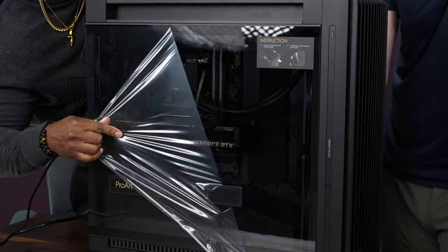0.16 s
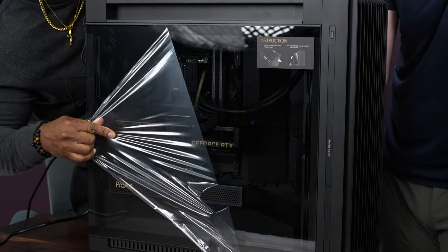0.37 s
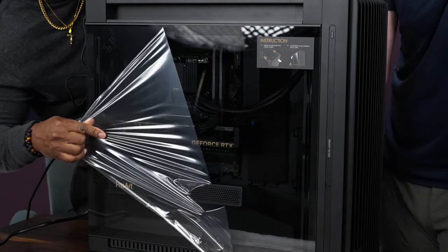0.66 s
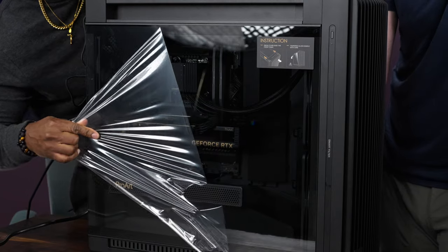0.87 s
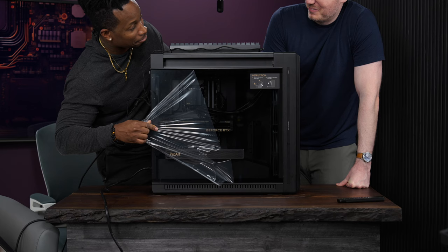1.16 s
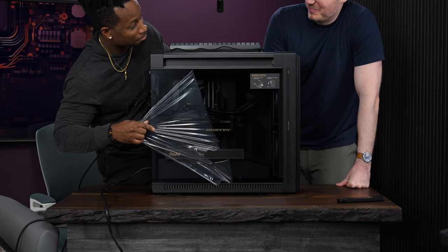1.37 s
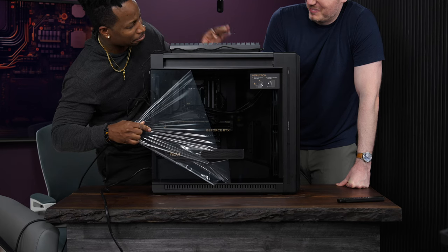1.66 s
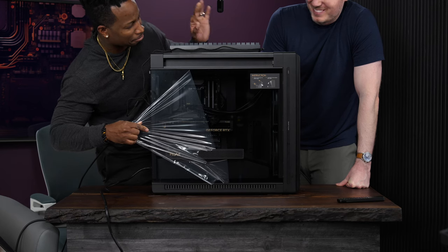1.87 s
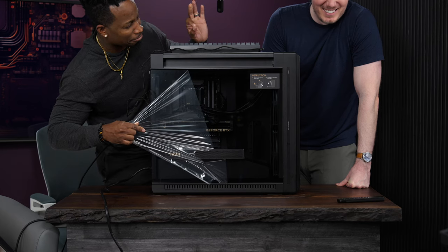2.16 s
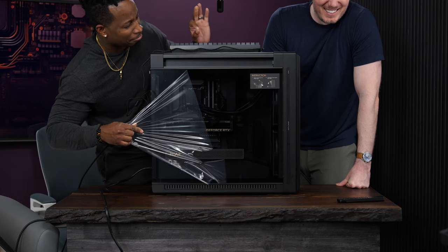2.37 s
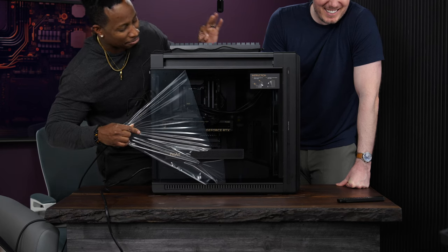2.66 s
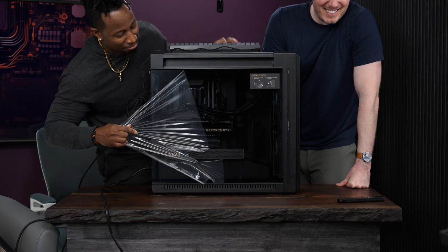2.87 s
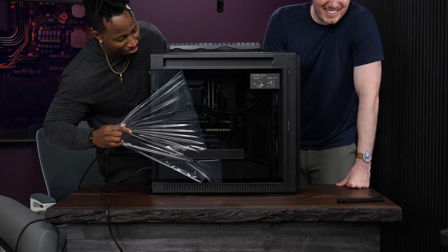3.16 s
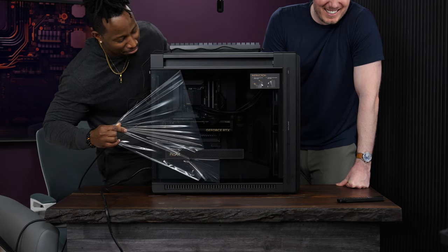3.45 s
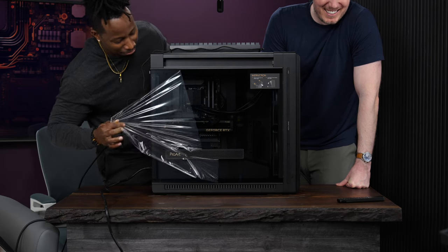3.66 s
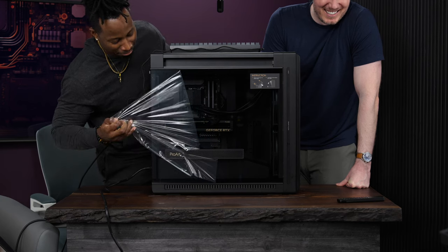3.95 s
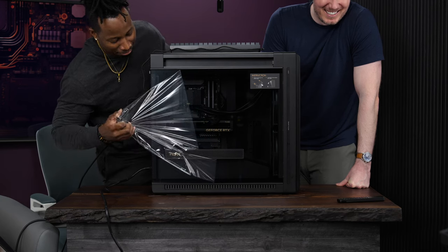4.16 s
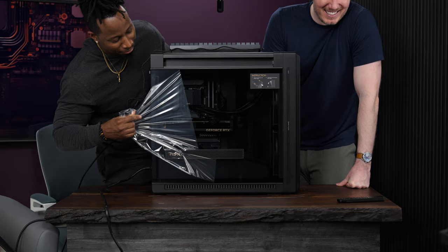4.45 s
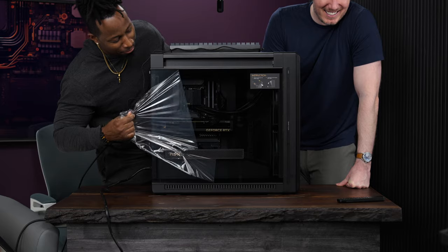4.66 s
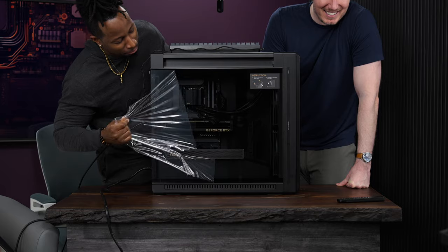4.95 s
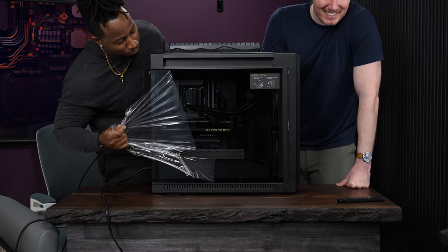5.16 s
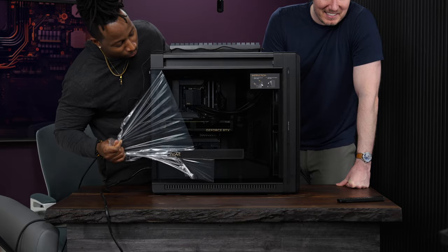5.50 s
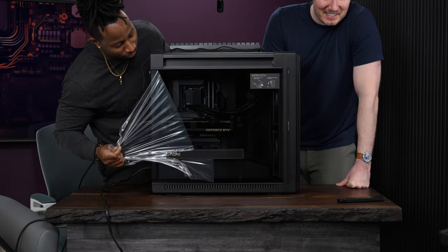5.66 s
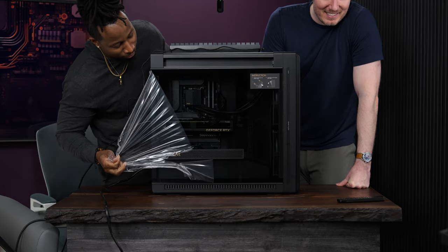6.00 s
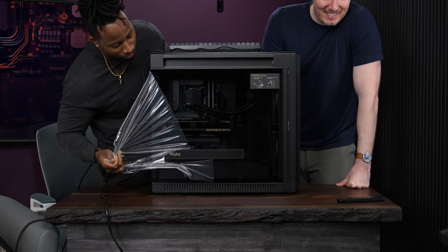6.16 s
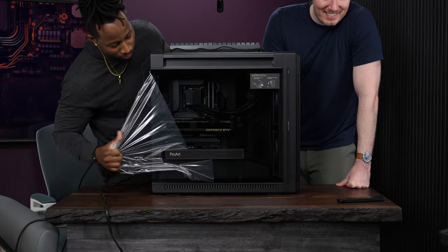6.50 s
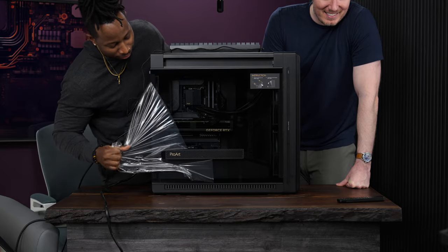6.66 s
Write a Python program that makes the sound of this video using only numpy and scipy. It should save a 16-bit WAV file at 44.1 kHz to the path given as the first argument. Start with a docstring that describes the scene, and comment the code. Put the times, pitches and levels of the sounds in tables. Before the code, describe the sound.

In a small, dry room, a close microphone catches film being peeled from a computer case's glass panel. Fast buzzing tick trains and tiny high squeaks fade to near quiet, then irregular tearing snaps thump the panel. The slack sheet flaps with sharp cracks, is regripped in a crackling burst, rustles faintly and is finally squeezed.

```python
"""Ticking trains of a film letting go are heard first, over a faint rustle, in a small, dry room.
Protective film is peeled off the glass side panel of a computer case: stick-slip clicks make the ticks,
gliding harmonics two squeals, bursts of tiny snaps the tears, and panel modes the thumps.
Then the slack sheet flaps, crackles and rustles in the hand, made of ringing clicks and random grains.
Near echoes take paths about 1.7 to 3.7 m longer than the direct one; the microphone sheds rumble."""
import sys
import numpy as np
from scipy import signal
from scipy.fft import rfft, irfft
from scipy.io import wavfile
from scipy.ndimage import uniform_filter1d

SR = 44100
rng = np.random.default_rng(int(sys.argv[2]) if len(sys.argv) > 2 else 0)


def transcribe(u):
    """Save the signal u as a 16-bit wav file named by the first command-line argument.

    u: samples, shape (n,) or (channels, n), limited to [-1, 1]; the rate is SR.
    q: integer samples, one column per channel.
    """
    v = np.clip(np.atleast_2d(u).T, -1, 1)
    q = np.round(v * 32767).astype(np.int16)
    wavfile.write(sys.argv[1], SR, q)


N = 301203
TIME = np.arange(N) / SR  # s

# Room tone. Each row: frequency in Hz, relative level in dB.
AIR_COLOUR = [(24, -61), (40, 5), (189, -39), (422, -41), (585, -26), (680, 16), (1150, -38), (2210, 10),
              (2700, 1), (4460, 10.5), (16000, -2)]
# Stir of the loose sheet in the hand. Each row: time in seconds, crackle level in dB.
HANDLING = [(0, -46), (.16, -58), (.26, -68), (.46, -60.5), (.6, -78), (1.4, -65), (1.8, -68.5),
            (2.23, -77), (2.9, -68.5), (3.56, -61), (3.8, -63), (4.4, -62.5), (5.2, -64.5), (5.55, -68),
            (5.9, -65), (6.26, -57), (6.38, -58.5), (6.68, -58)]
# The hand takes a new grip. Each row: time in seconds, crackle in dB, shake in dB, before the grip gain.
REGRIP = [(4.42, -55, -62), (4.54, -56.5, -59.5), (4.61, -44.5, -42.5), (4.72, -45, -48.5),
          (4.87, -46, -48.5), (4.93, -50, -49.5), (4.97, -61.5, -67)]
# The hand squeezes the sheet. Each row: time in seconds, crackle in dB, shake in dB, before the grip gain.
SQUEEZE = [(6.68, -72, -84), (6.718, -49.5, -66), (6.78, -41, -60), (6.83, -35.5, -50)]
# A taut sheet hardly creases, a slack one does. Each row: time in seconds, crease gain in dB.
SLACK = [(0, -64), (2.2, 4), (3.3, 1.5), (3.8, 4), (4.5, 4), (5.0, -0.5), (5.9, 7), (6.8, -2.5)]
# Crease sizes of the loose sheet. Each row: ring in Hz, share in dB.
CREASES = [(1100, -6), (1800, -15), (2550, -2.5), (3400, -8), (4700, -15), (6400, 3), (9500, -1.5)]
# Colour of a crease or rub in the rustle. Each row: frequency in Hz, relative level in dB.
RUSTLE_COLOUR = [(180, -72), (300, -3), (519, -7), (678, -4), (994, -4), (1170, -10), (1780, -5.5),
                 (2650, -5), (3350, -5.5), (5430, -4.5), (7080, -10), (14700, -20.5), (16000, -23.5)]
# Low modes of the panel and the sheet stretched from it.
# Each row: frequency in Hz, relative level in dB, decay by 60 dB in seconds.
PANEL_MODES = [(62.7, -3.5, 0.11), (80, -10.5, 0.16), (127.3, -1.5, 0.078), (152.7, -5, 0.095),
               (201.4, 2, 0.053), (272, -9, 0.045), (328, -13, 0.072), (519.3, -8.5, 0.14),
               (599, -8.5, 0.079)]
# Steady pulls. Each row: start in seconds, end in seconds, slips per second, timing scatter in periods,
# level at start in dB, level at end in dB, ring of the glue edge in Hz, ring in dB, body in dB.
PULLS = [(.0025, 0.083, 115, 0.059, -38, -39.5, 5200, -7.5, 3.5),
         (0.435, 0.502, 96, 0.13, -56, -60, 5260, -2, -20),
         (0.691, 0.775, 112, 0.049, -38.5, -51.5, 4480, -10, -4.5),
         (.776, 0.937, 143, .035, -46.5, -42.5, 4500, -4.5, -2),
         (.949, 1.374, 101, .04, -51, -54.5, 5630, -6.5, -2.5),
         (1.433, 1.604, 87, 0.38, -59.5, -66, 6100, -6, -5.5),
         (1.604, 1.753, 210, .4, -65, -61, 5040, -3, 11.5),
         (1.925, 2.141, 109, 0.085, -67.5, -65, 4400, -12, 7),
         (3.2, 3.397, 170, .45, -50.5, -45.5, 5320, 3.5, 5)]
# Colour of a slip at the glue edge. Each row: frequency in Hz, relative level in dB.
SLIP_COLOUR = [(180, -89), (300, 5.5), (366, 2), (425, -5), (870, -0.5), (978, -6.5), (1340, -9.5),
               (2030, -13), (3290, 1), (4370, -1), (5340, -8.5), (10200, 1.5), (11300, -1.5), (16000, -13)]
# Resonances of the taut film. Each row: frequency in Hz, width in Hz, level in dB.
TAUT_FILM = [(2015, 290, -2), (2720, 320, -7), (4460, 430, -10), (5280, 110, -12), (5870, 590, -3.5),
             (6840, 380, 3), (11060, 410, -11), (15400, 430, -5)]
# Jerks of the glue edge. Each row: start in seconds, length in seconds, level in dB,
# peak of the opening snap in dB.
JERKS = [(0.325, 0.041, -54.5, -54), (1.704, 0.066, -59, -62), (2.267, 0.031, -54, -33),
         (2.302, 0.028, -51, -41), (2.403, 0.0092, -59, -30.5), (2.43, 0.017, -52.5, -62),
         (2.44, 0.022, -45, -25.5), (2.496, 0.016, -67, -45), (2.511, .03, -40.5, -34.5),
         (2.554, 0.016, -55.5, -46), (2.614, 0.019, -41.5, -25), (2.650, .014, -67, -55),
         (2.6927, 0.027, -48, -59), (2.775, 0.02, -48, -27), (2.807, 0.03, -57.5, -50),
         (2.859, 0.022, -48.5, -24), (2.936, 0.022, -47, -52), (2.965, 0.048, -52.5, -29.5),
         (3.041, 0.042, -52.5, -31.5), (3.165, 0.019, -57.5, -34.5)]
# Colour of a snap in the loose sheet. Each row: frequency in Hz, relative level in dB.
SHEET_COLOUR = [(250, -38.5), (420, -6), (512, -1), (663, -2), (1200, -4), (1580, -6), (2140, -5),
                (3000, -5), (5510, -4), (7140, -8), (8310, -6.5), (14000, -11.5), (16000, -10.5)]
# Lone snaps of a crease. Each row: time in seconds, peak in dB, ring in Hz, ring in dB.
SNAPS = [(.407, -41, 6580, -11), (.589, -46, 5800, 3), (3.202, -31.5, 4900, -10), (3.372, -27, 5540, 4),
         (3.597, -21.5, 4700, 9), (4.104, -12.5, 1180, -3), (4.212, -32.5, 9800, 15),
         (4.258, -12, 5550, -4), (4.775, -26.5, 2670, -2), (4.985, -40.5, 5660, -14),
         (5.041, -42, 1900, -8), (5.169, -43.5, 4980, -8), (5.417, -45, 5330, -15), (5.588, -41, 2180, -6),
         (5.62, -46, 3100, -5), (5.7, -42.5, 3750, -8), (5.945, -42.5, 2420, -3), (5.985, -37.5, 2040, 3),
         (6.039, -37, 5780, 0), (6.073, -25.5, 2600, 1), (6.138, -44.5, 2700, 19), (6.308, -33.5, 6200, -5),
         (6.387, -40, 2450, 19), (6.52, -38.5, 5560, -19), (6.7, -35, 5840, 3), (6.824, -23, 5700, 6)]
# One list per squeal glide. Each row: time in seconds, mean slip rate in Hz, level in dB.
SQUEALS = [
    [(.409, 7450, -66), (.416, 6500, -48), (.423, 5870, -58), (.428, 6840, -55), (.436, 6000, -70)],
    [(.616, 7300, -59), (.621, 6550, -53), (.634, 6500, -63), (.643, 6850, -63), (.654, 6600, -61),
     (.661, 6000, -46)],
    [(.660, 3950, -52), (.667, 3620, -50), (.675, 3970, -35), (.681, 3350, -39), (.685, 2250, -42),
     (.690, 910, -56)],
]
# Flaps of the slack sheet. Each row: start in seconds, length in seconds, level in dB before the flap gain,
# thump in dB, ring of the fold in Hz, ring in dB.
FLAPS = [(3.586, 0.068, -42, -48, 1610, -10.5), (3.596, 0.022, -37, -63, 4570, -5),
         (3.693, 0.031, -41, -53.5, 6340, -7), (4.006, 0.012, -27.5, -31, 2200, -11),
         (4.038, 0.028, -29, -42, 840, -5.5), (4.09, 0.0092, -33.5, -47, 1290, -17),
         (4.1015, 0.022, -27.5, -38, 1300, -2.5), (4.188, .0063, -44, -54, 895, -9),
         (4.248, 0.015, -21, -24.5, 2090, -12), (4.312, 0.028, -29, -28, 3020, -40),
         (4.541, 0.035, -44, -38, 2530, -7), (4.586, 0.021, -32.5, -65, 2600, -8),
         (4.64, 0.0067, -25, -37, 3760, -17), (4.641, 0.032, -28.5, -52, 3770, -22),
         (4.774, 0.0088, -32, -36, 2680, -10), (4.83, 0.031, -37.5, -40.5, 5430, -34),
         (5.294, 0.0093, -50, -74, 4140, -5), (5.619, 0.05, -60, -69, 455, -10),
         (5.726, 0.034, -61, -58, 497, 14), (6.074, 0.0099, -38, -68, 2570, -11),
         (6.22, 0.021, -41, -55, 3780, -25), (6.261, 0.013, -46.5, -57, 1510, -17),
         (6.583, 0.055, -45.5, -42.5, 1600, -36)]
# Early echoes from the table and the case. Each row: delay in seconds, level in dB.
ECHOES = [(.0049, -32), (.0068, -22), (.0082, -16), (0.0109, -20.5)]

AIR_DB = -74.5
BODY_HZ, SHEEN_HZ = 1800, 8000  # body lies below the one, sheen above the other
TOP_HZ = 15900  # top of the recorded band
# bunched tight, the sheet loses body, gains sheen and shakes less
BUNCHED_FROM_S, BUNCH_BODY_DB, BUNCH_SHEEN_DB, BUNCH_SHAKE_DB = 5.79, -2.5, 5.5, -4
# a pocket in the gathered sheet rings as the hand turns it, loudest at POCKET_S
POCKET_S, POCKET_HZ, POCKET_CYCLES = 6.05, 2500, 6
POCKET_RISE_DB_PER_S, POCKET_FALL_DB_PER_S = 61, 28
HOLLOW_HZ, HOLLOW_CYCLES = 526, 16
EASE_S, EASE_DB = 0.022, -15.5  # fade as the hand eases off a pull
EDGE_HZ = 5530  # ring of the glue edge in a jerk
# a bigger fold rings lower and has more body
FOLD_HZ, FOLD_BODY_DB, FOLD_BODY_DB_PER_OCTAVE = 2340, -2.5, -2.5
ROOM_DB, ROOM_T60_LOW, ROOM_T60_HIGH = -11.5, 0.11, 0.09  # tail level; decays in s


def amp(db):
    """Amplitude of a level in dB."""
    return 10 ** (np.asarray(db) / 20)


def unit(x):
    """Scale to an energy of 1."""
    return x / np.sqrt(np.sum(x ** 2) + 1e-18)


def add(track, s, x):
    """Mix x into the track at s seconds."""
    i = int(np.clip(s * SR, 0, N - 1))
    track[i:i + len(x)] += x[:N - i]


def through(x, response):
    """Filter by an impulse response, keeping the length."""
    return signal.fftconvolve(x, response)[:len(x)]


def fade(t, t60):
    """Exponential decay, 60 dB in t60 seconds."""
    return np.exp(-np.log(1000) * t / t60)


def colour(points, size=2048):
    """Minimum-phase response of energy 1 with the given (Hz, dB) spectrum."""
    hz, db = np.transpose(points)
    f = np.maximum(np.arange(size // 2 + 1) * SR / size, 1)
    level_db = np.interp(np.log(f), np.log(hz), db)
    cepstrum = irfft(np.log(amp(level_db)))
    # folding the cepstrum forward makes the response causal
    cepstrum[1:size // 2] *= 2
    cepstrum[size // 2 + 1:] = 0
    return unit(irfft(np.exp(rfft(cepstrum))))


def below(x, hz, size=1024):
    """The part of x under hz, without delay."""
    lowpass = signal.butter(2, hz, fs=SR, output="sos")
    return signal.sosfiltfilt(lowpass, np.pad(x, size))[size:-size]


def tight(x, hz):
    """A sheet under tension cannot flop: its motion below hz is lost."""
    return x - below(x, hz)


def tone(x, body_db, sheen_db):
    """Slack film has more body, small tight creases have more sheen."""
    body, under_sheen = below(x, BODY_HZ), below(x, SHEEN_HZ)
    middle, sheen = under_sheen - body, x - under_sheen
    return amp(body_db) * body + middle + amp(sheen_db) * sheen


def resonance(x, hz, cycles):
    """Band-pass that rings for about so many cycles."""
    b, a = signal.iirpeak(min(hz, SR / 3), max(cycles, 1), fs=SR)
    return signal.lfilter(b, a, x)


def ringing(click, hz, ring_db, cycles):
    """Film rings for a few cycles after a click."""
    return unit(click + amp(ring_db) * unit(resonance(click, hz, cycles)))


def hollow(x):
    """The brief hum that a sound wakes in the hollow of the case."""
    return resonance(x, HOLLOW_HZ, HOLLOW_CYCLES)


def scattered(click, scatter_db, t60):
    """The wave comes back from nearby folds and edges, ever weaker."""
    folds = rng.standard_normal(len(click)) * fade(np.arange(len(click)) / SR, t60)
    return unit(click + amp(scatter_db) * unit(through(folds, click)))


def dispersed(click, lag_s):
    """Bending waves carry the treble first; 1 kHz is delayed by lag_s."""
    khz = np.arange(len(click) // 2 + 1) * SR / len(click) / 1000
    phase = 4 * np.pi * 1000 * lag_s * np.sqrt(khz)
    return irfft(rfft(click) * np.exp(-1j * phase))


def reflected(x, lag_s=0.000293, echo_db=-11):
    """The wave comes back inverted from the stuck film, cutting evenly spaced notches."""
    hz = np.arange(len(x) // 2 + 1) * SR / len(x)
    echo = amp(echo_db) * np.exp(-2j * np.pi * hz * lag_s)
    return irfft(rfft(x) * (1 - echo), len(x))


def grains(count, per_s, spread_db):
    """Random impulses of either sign; spread_db makes many small and a few large; rms 1."""
    chance = rng.random((count, 3))
    struck = chance[:, 0] < per_s / SR
    sizes = amp(spread_db * np.minimum(-np.log(1 - chance[:, 1]), 4))
    signs = np.sign(chance[:, 2] - .5)
    return unit(struck * sizes * signs) * np.sqrt(count)


def wander(count, hz):
    """Smooth chance, mostly slower than hz; rms 1."""
    return unit(below(rng.standard_normal(count), hz)) * np.sqrt(count)


def panel(detune, scatter_db):
    """Response of the low modes; scatter shifts them with the tension and the place of the tug."""
    t = np.arange(SR // 4) / SR
    chance = rng.standard_normal((len(PANEL_MODES), 2))
    modes, sign = np.zeros(len(t)), 1
    for (hz, db, t60), (pitch, size) in zip(PANEL_MODES, chance):
        wave = np.sin(2 * np.pi * hz * (1 + detune * pitch) * t)
        modes += sign * amp(db + scatter_db * size) * wave * fade(t, t60)
        sign = -sign
    return unit(modes)


def room_air():
    """Faint room tone: steady noise shaped to a spectrum."""
    return amp(AIR_DB) * through(rng.standard_normal(N), colour(AIR_COLOUR))


def effort(shake_db=-8, grip_db=2.0):
    """Bunching (0 or 1), and the crackle and shake levels in dB: a gentle stir plus two firm grips."""
    bunched = (TIME > BUNCHED_FROM_S).astype(float)
    crackle = amp(np.interp(TIME, *np.transpose(HANDLING)))
    shake = crackle * amp(shake_db + BUNCH_SHAKE_DB * bunched)
    for grip in (REGRIP, SQUEEZE):
        s, grip_crackle_db, grip_shake_db = np.transpose(grip)
        release = fade(np.maximum(TIME - s[-1], 0), t60=0.34)
        held = amp(grip_db) * (TIME > s[0]) * release
        crackle = np.hypot(crackle, held * amp(np.interp(TIME, s, grip_crackle_db)))
        shake = np.hypot(shake, held * amp(np.interp(TIME, s, grip_shake_db)))
    return bunched, 20 * np.log10(crackle), 20 * np.log10(shake)


def rustle(per_s=75, spread_db=3.5, ring_db=3, rub_db=-3, rub_growth=0.022, crease_db=-2, jerk_db=3.0,
           jerk_hz=35, pocket_db=-4, sheen_db=1, sheen_growth=0.18, hollow_db=3):
    """Creases of several sizes crackle over the fine rub of film on film, and shake the sheet."""
    bunched, db, shake_db = effort()
    firmness = db - db.mean()  # dB
    click, creases = colour(RUSTLE_COLOUR), np.zeros(N)
    for hz, share_db in CREASES:
        crease = ringing(scattered(click, scatter_db=-8, t60=0.012), hz, ring_db, cycles=2.5)
        creases += amp(share_db) * through(grains(N, per_s, spread_db), dispersed(crease, 0.00058))
    creases /= np.sqrt(len(CREASES))
    # gentle handling gives lone creases; in a firm grip they merge into a dense rub
    merge_db = rub_growth * firmness
    rub = amp(rub_db + merge_db) * through(grains(N, 3000, 2.5), click)
    slack_db = np.interp(TIME, *np.transpose(SLACK))
    crackle = amp(crease_db + slack_db - merge_db) * creases + rub
    # the pocket swells quickly and fades slowly
    pocket = unit(resonance(crackle, POCKET_HZ, POCKET_CYCLES)) * np.sqrt(N)
    rise_db = POCKET_RISE_DB_PER_S * (TIME - POCKET_S)
    fall_db = POCKET_FALL_DB_PER_S * (POCKET_S - TIME)
    crackle = crackle + amp(pocket_db + np.minimum(rise_db, fall_db)) * pocket
    # the sheet gives way in small jerks
    give_db = jerk_db * wander(N, jerk_hz)
    shake = through(grains(N, 430, 5.1) * amp(shake_db + give_db), tight(panel(0, 0), hz=75))
    crackle = crackle + bunched * amp(hollow_db) * hollow(crackle)
    # a firm grip makes smaller, brighter creases
    bright_db = sheen_db + sheen_growth * firmness + BUNCH_SHEEN_DB * bunched
    return tone(crackle * amp(db + give_db), BUNCH_BODY_DB * bunched, bright_db) + shake


def pulls(lag_s=0.000745, size_db=2, uneven_db=10, ring_drift=0.019, scatter_db=-6, thump_db=-12,
          fizz_db=-16, sheen_db=-2.5, taut_db=-1):
    """The glue edge sticks and slips at a pace set by the hand; every slip ticks, and tugs at the panel."""
    out, tugs, bare = np.zeros(N), np.zeros(N), colour(SLIP_COLOUR)
    taut = unit(sum(amp(db) * unit(resonance(bare, hz, hz / width)) for hz, width, db in TAUT_FILM))
    click = unit(reflected(bare + amp(taut_db) * taut))
    for start, end, rate, uneven, start_db, end_db, ring_hz, ring_db, body_db in PULLS:
        train, length = np.zeros(SR), end - start
        chance = rng.standard_normal((int(length * rate) + 1, 4))
        for k, (late, size, ring, lag) in enumerate(chance):
            s = (k + uneven * late) / rate
            pull_db = np.interp(s, [0, length], [start_db, end_db])
            ease_db = np.interp(length - s, [0, EASE_S], [EASE_DB, 0])
            # an uneven pace also makes uneven sizes
            chance_db = (size_db + uneven * uneven_db) * size / 2
            strength = amp(pull_db + ease_db + chance_db) * np.sqrt(SR / rate)
            tick = scattered(click, scatter_db, t60=.011)
            tick = ringing(tick, ring_hz * (1 + ring_drift * ring), ring_db, cycles=6.2)
            add(train, s, strength * dispersed(tick, lag_s * np.exp(0.264 * lag)))
            add(tugs, start + s, np.array([strength * amp(body_db / 2)]))
        # fine threads of glue break between the slips
        loudness = np.sqrt(np.abs(uniform_filter1d(train ** 2, SR // 50)))
        threads = loudness * through(grains(SR, 3000, 2.3), click)
        add(out, start, tone(train + amp(fizz_db) * threads, body_db, sheen_db))
    return out + amp(thump_db) * through(tugs, tight(panel(0, 0), hz=55))


def avalanche(length, ring_hz, ring_db, rise_s, tail_t60, per_s=6000):
    """A quick burst of tiny, equal snaps rings a fold; rms about 1 over its length in seconds."""
    t = np.arange(SR // 8) / SR
    swell = (1 - np.exp(-t / rise_s)) * fade(np.maximum(t - length * 0.63, 0), tail_t60)
    click = ringing(colour(SHEET_COLOUR), ring_hz, ring_db, cycles=2.5)
    burst = through(swell * grains(len(t), per_s, spread_db=0), click)
    return np.sqrt(length * SR) * unit(burst)


def thump(push_s):
    """A jump in tension pushes the panel: a half-sine drives its modes."""
    t = np.arange(SR // 8) / SR
    push = np.sin(np.pi * np.minimum(t / push_s, 1))
    return np.sqrt(0.015 * SR) * unit(through(panel(detune=.01, scatter_db=2.5), push))


def snap(ring_hz, ring_db, lag_s=0.00092, scatter_db=-7, scatter_t60=0.032):
    """One sharp, ringing click of the film; peak 1."""
    click = scattered(colour(SHEET_COLOUR), scatter_db, scatter_t60)
    click = dispersed(ringing(click, ring_hz, ring_db, cycles=5.3), lag_s)
    return click / np.abs(click).max()


def jerks(body_db=-1, sheen_db=-3.5, thump_db=1, hollow_db=-2, tear_lag_s=0.00113, push_lag_s=0.00419):
    """The glue edge snaps free, a patch tears off behind it, and the panel thumps in proportion."""
    out = np.zeros(N)
    for s, length, db, snap_db in JERKS:
        add(out, s, amp(snap_db) * snap(EDGE_HZ, ring_db=8))
        tear = avalanche(length, EDGE_HZ, ring_db=-8.5, rise_s=0.001, tail_t60=0.041)
        tear = tear + amp(hollow_db) * hollow(tear)
        add(out, s + tear_lag_s, amp(db) * tone(tear, body_db, sheen_db))
        add(out, s + push_lag_s, amp(db + thump_db) * tight(thump(push_s=0.00036), hz=85))
    return out


def snaps():
    """Single creases buckle with a sharp click."""
    out = np.zeros(N)
    for s, db, ring_hz, ring_db in SNAPS:
        add(out, s, amp(db) * snap(ring_hz, ring_db))
    return out


def squeals(overtone_db=(0, 1, -6, -10), dull_db=-14, rasp_db=-15, wobble=0.0335):
    """A creeping edge slips thousands of times a second, and slows into ticks as the pull grows."""
    out = np.zeros(N)
    for glide in SQUEALS:
        s, hz, db = np.transpose(glide)
        t = np.arange(s[0], s[-1], 1 / SR)
        rate = np.interp(t, s, hz) * (1 + wobble * wander(len(t), 690))
        phase = 2 * np.pi * np.cumsum(rate) / SR
        wave = np.zeros(len(t))
        for k, level_db in enumerate(overtone_db, 1):
            treble_db = np.interp(k * rate, [11000, 13000], [0, dull_db])
            wave += amp(level_db + treble_db) * np.sin(k * phase) * (k * rate < TOP_HZ)
        rasp = amp(rasp_db) * through(rng.standard_normal(len(t)), colour(SLIP_COLOUR))
        add(out, s[0], (unit(wave) * np.sqrt(len(t)) + rasp) * amp(np.interp(t, s, db)))
    return out


def flaps(sheen_db=-4.0, push_lag_s=0.00257, gain_db=-1):
    """The slack sheet flips over: a burst of snaps rings the fold, and the jump in tension thumps."""
    out = np.zeros(N)
    for s, length, db, thump_db, fold_hz, ring_db in FLAPS:
        burst = avalanche(length, fold_hz, ring_db, rise_s=0.00043, tail_t60=0.045)
        body_db = FOLD_BODY_DB + FOLD_BODY_DB_PER_OCTAVE * np.log2(fold_hz / FOLD_HZ)
        add(out, s, amp(db + gain_db) * tone(burst, body_db, sheen_db))
        add(out, s + push_lag_s, amp(thump_db) * tight(thump(push_s=0.0014), hz=62))
    return out


def room(x, onset_s=0.021):
    """A few near echoes, then a short tail whose treble dies first."""
    t = np.arange(SR // 2) / SR
    noise = rng.standard_normal(len(t))
    low = below(noise, 6000)
    high = amp(4) * (noise - low)
    tail = (low * fade(t, ROOM_T60_LOW) + high * fade(t, ROOM_T60_HIGH)) * (t > onset_s)
    response = amp(ROOM_DB) * unit(tail)
    response[0] = 1  # direct sound
    for s, db in ECHOES:
        add(response, s, amp([db]))
    return through(x, response)


def scene():
    """Peel, flaps and rustle in the room, over its faint air."""
    film = rustle() + pulls() + jerks() + snaps() + squeals() + flaps()
    return (room(film) + room_air())[None]


def record(dry):
    """The microphone sheds the rumble; the recorder cuts the top."""
    rumble_cut = signal.butter(4, 42, "high", fs=SR, output="sos")
    top_cut = signal.ellip(10, .2, 70, TOP_HZ, fs=SR, output="sos")
    return signal.sosfilt(top_cut, signal.sosfilt(rumble_cut, dry))


dry = scene()
out = record(dry)
transcribe(out)
```